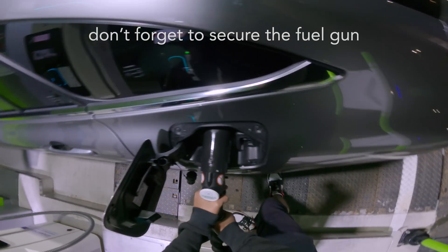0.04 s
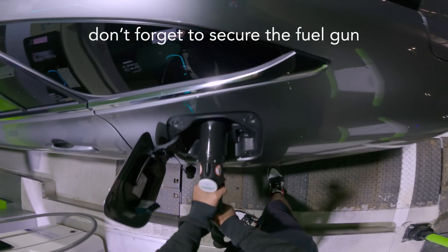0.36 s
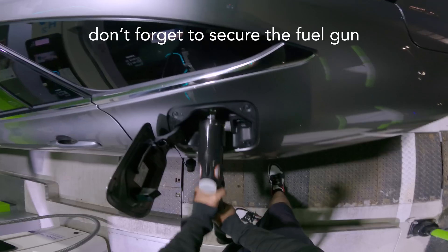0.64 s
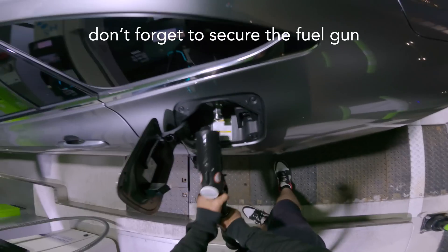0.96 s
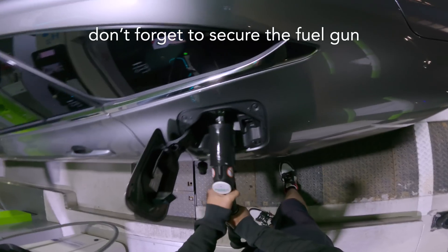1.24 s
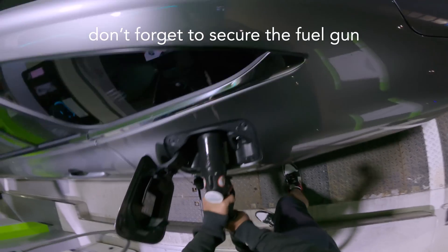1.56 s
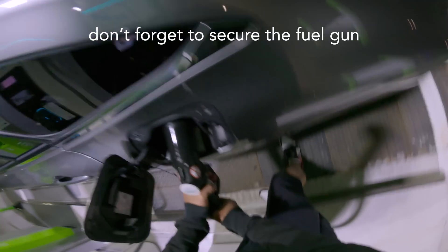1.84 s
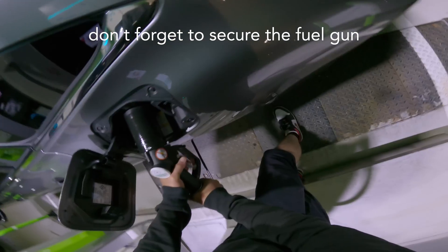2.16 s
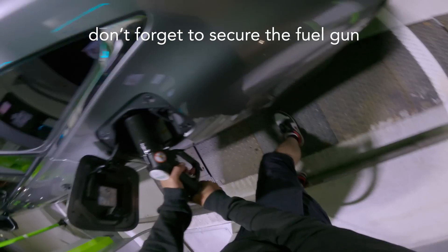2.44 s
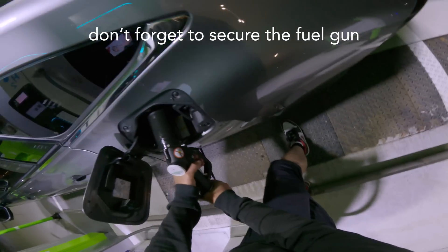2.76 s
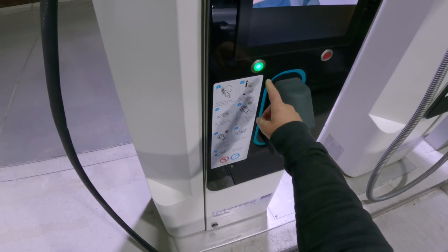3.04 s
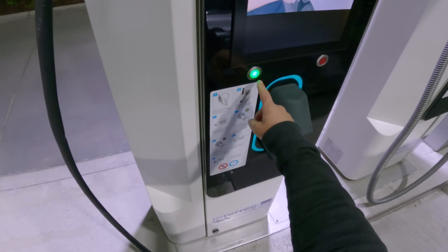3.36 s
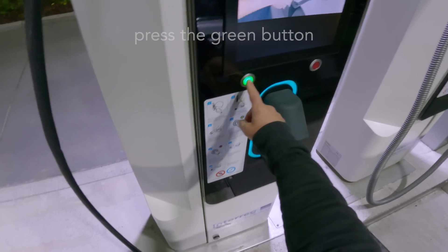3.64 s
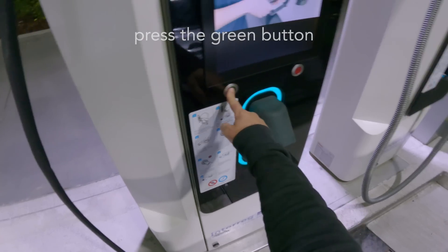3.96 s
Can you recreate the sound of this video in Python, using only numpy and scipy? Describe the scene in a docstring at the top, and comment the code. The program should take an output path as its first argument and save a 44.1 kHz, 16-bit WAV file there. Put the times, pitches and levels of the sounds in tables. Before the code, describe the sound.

Close by, a metal fuel nozzle is pushed into a car's filler port in two bursts of clunks and clinks, then latches with a sharp snap. The low hum and traffic rush of a covered filling station continue afterward.

```python
"""Fuel nozzle into a filler port.

A nozzle is pushed into a car's filler port, seated and locked, an arm's length from the microphone.
Each contact rings the body panel, the filler neck and the metal spout, and the car thuds.
The spout scrapes, squeaks and clinks on its way in; the latch snaps shut.
Under a station roof, machines hum and traffic rushes; near the end the pump's own hum takes over."""
import sys
import numpy as np
from scipy import signal
from scipy.fft import rfft, irfft
from scipy.io import wavfile
from scipy.ndimage import uniform_filter1d, minimum_filter1d

SR = 44100
rng = np.random.default_rng(int(sys.argv[2]) if len(sys.argv) > 2 else 0)


def to_wav(sig):
    """Store sig (one row per channel, or 1-D mono) as 16-bit WAV at the path in sys.argv[1].

    Samples outside -1..1 are clipped; the rate is SR.
    """
    pcm = np.clip(np.atleast_2d(sig), -1, 1) * 32767
    pcm = np.round(pcm).astype(np.int16)
    wavfile.write(sys.argv[1], SR, pcm.T)  # frames by channels


N = 4 * SR


def undb(db):
    """Decibels to gain."""
    return 10 ** (np.asarray(db) / 20)


def unit(x):
    """Scale to rms 1."""
    return x / np.sqrt(np.mean(x ** 2))


def colour(x, points):
    """Filter by a curve of (Hz, dB) points."""
    hz, db = np.array(points, float).T
    bins_hz = np.maximum(np.fft.rfftfreq(x.shape[-1], 1 / SR), 1)
    gain = undb(np.interp(np.log(bins_hz), np.log(hz), db))
    return irfft(rfft(x) * gain, x.shape[-1])


def noise(points, size):
    """Coloured noise of rms 1."""
    return unit(colour(rng.standard_normal(size), points))


def fade(t, t60):
    """Free decay, 60 dB down at t60."""
    return np.exp(-np.log(1000) * t / t60)


def mode(t, hz, t60):
    """Decaying sine of random phase."""
    return np.sin(2 * np.pi * (hz * t + rng.random())) * fade(t, t60)


def walk(rate_hz):
    """Random wander, spread near 1."""
    knots = rng.standard_normal(256)
    return np.interp(np.arange(N) / SR * rate_hz, np.arange(len(knots)), knots)


def add(out, start_s, x):
    """Mix a sound in at its time."""
    i = int(start_s * SR)
    out[i:i + len(x)] += x[:N - i]


# Background spectra by the car and by the pump. Each row: frequency in Hz, relative level in dB.
CAR_AIR_COLOUR = [(13, -37), (22, -14), (36, -8), (66, 1.5), (161, -12.5), (201, -14), (311, -20.5),
                  (387, -27), (420, -26), (537, -28.5), (582, -23), (668, -28), (1010, -18), (1320, -22),
                  (1780, -25), (2610, -37), (4640, -45), (12100, -76), (15000, -108)]
PUMP_AIR_COLOUR = [(13, -37), (22, -22), (53, 0), (86, -8.5), (120, -12), (243, -20), (264, -22),
                   (366, -23.5), (420, -26.5), (455, -25), (522, -26.5), (582, -19.5), (632, -24.5),
                   (1030, -17), (1690, -24), (3340, -42.5), (5930, -50.5), (9430, -65), (15000, -94)]
# Stereo width. Each row: frequency in Hz, side against mid in dB.
AIR_WIDTH = [(40, -33.5), (150, -31.5), (350, -15), (700, -8), (1400, -5.5), (3000, -4.5), (10000, -6.5)]
# Background swell. Each row: time in seconds, rumble gain in dB, traffic gain in dB.
AIR_SWELL = [(0, -1.5, -2.5), (.35, 0, 1), (.62, -1, 2.5), (1.1, -2.5, -1.5), (1.75, -5, -1),
             (2.2, -4.5, 2.5), (2.55, -3, -.5), (3.3, 1, -2), (3.75, -2.5, -1.5), (3.92, 3.5, -2),
             (4, 0, -2)]
# Machine tones. Each row: frequency in Hz, level by the car in dB, level by the pump in dB.
HUM_TONES = [(50, -35, -28), (192.4, -35.5, -44.5), (366, -50.5, -45), (586.5, -48.5, -40),
             (954, -48.5, -43)]
PUMP_TAKEOVER_S, CAR_AIR_DB, PUMP_AIR_DB, HUM_WANDER_HZ = 2.9, -21, -22, 1.44


def station(t):
    """Machines rumble and hum under the rush of traffic; the pump takes over late."""
    pump_share = np.clip((t - PUMP_TAKEOVER_S) / 0.14 + 0.5, 0, 1)
    car_gain = undb(CAR_AIR_DB) * np.sqrt(1 - pump_share)
    pump_gain = undb(PUMP_AIR_DB) * np.sqrt(pump_share)
    mid, side = (car_gain * noise(CAR_AIR_COLOUR, N) + pump_gain * noise(PUMP_AIR_COLOUR, N)
                 for _ in range(2))
    air = mid + colour(side, AIR_WIDTH) * np.array([[1], [-1]])
    rumble = colour(air, [(200, -5), (350, -7), (700, -30)])
    traffic = air - rumble
    times, rumble_db, traffic_db = np.array(AIR_SWELL).T
    out = rumble * undb(np.interp(t, times, rumble_db))
    out += traffic * undb(np.interp(t, times, traffic_db) + 0.5 * walk(9))
    for hz, car_db, pump_db in HUM_TONES:
        phase = 2 * np.pi * np.cumsum(hz + HUM_WANDER_HZ * walk(7.1)) / SR
        hum_db = car_db + (pump_db - car_db) * pump_share + 2 * walk(3.8)
        out += undb(hum_db) * np.sqrt(2) * np.sin(phase)
    return out


# Reflections off car and ground. Each row: delay in seconds, gain in dB.
ECHOES = [(.0047, -29), (0.0152, -23)]
# Spectra of roof tail and side scatter. Each row: frequency in Hz, relative level in dB.
ROOF_COLOUR = [(60, -13), (200, -1.5), (450, -9.5), (1500, -4.5), (5000, -19.5), (14000, -34)]
SCATTER_COLOUR = [(60, -29), (250, -20), (600, -2.5), (1200, -0.5), (4000, 3), (12000, 0)]
ROOF_DB, SCATTER_DB = -25, -12.5


def forecourt(x):
    """Near reflections and a weak tail under the roof; mids and treble scatter left and right."""
    t = np.arange(SR // 2) / SR
    near = x.copy()
    for delay_s, db in ECHOES:
        add(near, delay_s, undb(db) * x)
    tail = noise(ROOF_COLOUR, len(t)) * fade(t, t60=0.57) * (1 - np.exp(-t / 0.015))
    roof = signal.fftconvolve(x, tail / np.linalg.norm(tail))[:N]
    scatter = noise(SCATTER_COLOUR, len(t)) * fade(t, t60=0.051)
    side = signal.fftconvolve(x, scatter / np.linalg.norm(scatter))[:N]
    return near + undb(ROOF_DB) * roof + undb(SCATTER_DB) * side * np.array([[1], [-1]])


# Sleeve spectrum. Each row: frequency in Hz, relative level in dB.
RUSTLE_COLOUR = [(1000, -10), (4000, -5), (8000, -11.5), (12000, -32), (16000, -35)]


def rustle(t, peak_s=3.915, width_s=0.023, level_db=-41):
    """A sleeve hisses faintly as the hand reaches the button."""
    return undb(level_db) * noise(RUSTLE_COLOUR, N) * np.exp(-np.abs(t - peak_s) / width_s)


def squeak(t, peak_s=0.7145, width_s=0.005, centre_hz=2020, rise_hz_per_s=30000, level_db=-24):
    """The spout catches: a brief, rising stick-slip chirp."""
    since = t - peak_s
    hz = centre_hz + rise_hz_per_s * np.clip(since, -0.02, 0.02)
    envelope = np.exp(-(since / width_s) ** 2)
    return undb(level_db) * envelope * np.sin(2 * np.pi * np.cumsum(hz) / SR)


# Scrape envelope. Each row: time in seconds, level in dB.
SLIDE_LEVELS = [(.69, -50), (.712, -20), (.728, -19), (.745, -22), (.775, -36), (.80, -59)]
# Scrape spectrum. Each row: frequency in Hz, relative level in dB.
SLIDE_COLOUR = [(300, 3), (1000, 3), (2000, 0.5), (2800, -12), (4500, -8.5), (7000, -29), (12000, -47),
                (16000, -55)]


def slide(t):
    """The spout scrapes along the port in uneven catches."""
    times, db = np.array(SLIDE_LEVELS).T
    envelope = undb(np.interp(t, times, db)) * (t > times[0]) * (t < times[-1])
    catches = rng.standard_normal(N) * undb(3.3 * walk(58.2))
    return envelope * unit(colour(catches, SLIDE_COLOUR))


# Tip strikes. Each row: start in seconds, level in dB.
CLINKS = [(0.7546, -18.5), (.7580, -15.5), (0.7663, -25), (1.3550, -14.5)]
# Tip modes. Each row: frequency in Hz, relative level in dB, t60 in seconds.
TIP_MODES = [(2448, -6, .07), (4620, -3.5, 0.11), (4700, -7, 0.1), (4770, -10, 0.073), (4910, 5.5, 0.02),
             (5160, -6.5, 0.053), (5160, -19, .04)]


def tip(attack_s=0.00043):
    """The spout's steel tip clinks against the rim and rings on in close, beating modes."""
    out, t = np.zeros(N), np.arange(SR // 4) / SR
    attack = 1 - np.exp(-(t / attack_s) ** 2)
    for start_s, level_db in CLINKS:
        for hz, db, t60 in TIP_MODES:
            detune = 1 + 0.003 * rng.standard_normal()
            add(out, start_s, undb(level_db + db) * attack * mode(t, hz * detune, t60))
    return out


# Latch snaps. Each row: start in seconds, level in dB.
SNAPS = [(2.3328, 3.5), (2.3378, 10), (2.6006, 2), (2.6055, -20), (2.6135, -20)]
# Snap spectrum. Each row: frequency in Hz, relative level in dB.
SNAP_COLOUR = [(200, 2), (600, -1), (1050, -12), (1600, -10), (2400, -6), (3000, 1), (3600, 5), (4600, -3),
               (5800, 3.5), (7000, -2.5), (8200, -8.5), (9300, -12.5), (10700, -13), (13000, -25),
               (16000, -44)]
# Latch modes. Each row: frequency in Hz, relative level in dB, t60 in seconds.
LATCH_MODES = [(1050, -6.5, 0.019), (1580, -9, .016), (3470, 0.5, 0.0096), (3940, -7, 0.01),
               (5030, -6, .012), (5730, 2, 0.0091), (6600, -14, 0.0064), (10700, -21, 0.01)]


def latch(attack_s=0.00057, ring_db=-7, tail_db=-34):
    """The latch snaps shut: a bright crack, a few very short modes and a faint tail."""
    out, t = np.zeros(N), np.arange(SR // 8) / SR
    decay = fade(t, t60=0.0072) + undb(tail_db) * fade(t, t60=0.12)
    attack = 1 - np.exp(-t / attack_s)
    for start_s, level_db in SNAPS:
        ring = sum(undb(ring_db + db) * mode(t, hz, t60) for hz, db, t60 in LATCH_MODES)
        crack = decay * noise(SNAP_COLOUR, len(t))
        add(out, start_s, undb(level_db) * attack * (ring + crack))
    return out


def struck_part(t, modes, crowd_colour, ring_scale, crowd_t60, crowd_db, crack_db, attack_s):
    """A brief crack, then clear modes over a crowd of weaker ones, played as noise."""
    hz, db, t60 = np.array(modes, float).T[:, :, None]
    gain = undb(db) / np.sqrt(np.sum(undb(db) ** 2) / 2)
    detune = 1 + 0.0046 * rng.standard_normal(hz.shape)
    signs = (-1) ** np.arange(len(hz))[:, None]
    sines = signs * np.sin(2 * np.pi * hz * detune * t)
    clear = np.sum(gain * sines * fade(t, t60 * ring_scale), axis=0)
    crowd_decay = undb(crowd_db) * fade(t, crowd_t60 * ring_scale)
    crack_decay = undb(crack_db) * fade(t, t60=0.022)
    dense = noise(crowd_colour, len(t)) * np.hypot(crowd_decay, crack_decay)
    attack = 1 - np.exp(-t / attack_s)
    return attack * (clear + dense) / np.hypot(1, undb(crowd_db))


# Nozzle contacts. Each row: start in seconds, thud in dB, panel in dB, favoured panel pitch in Hz,
# neck in dB, spout in dB, click in dB, ring time as a factor.
CONTACTS = [ (0.6579, -28, -20, 230, -35, -33, -30, 0.94), (0.6634, -9.5, -4.5, 268, -23.5, -23, -32, 0.72),
            (.7370, -22, -18.5, 400, -23, -25.5, -27, 1.4), (.7540, -33, -10, 346, -28, -20, -16, 0.77),
            (.7580, -21, -13.5, 260, -17, -27, -29, 0.96), (0.766, -39, -38, 400, -30, -23, -20, 0.68),
            (.8530, -7, -11, 210, -15.5, -29, -21.5, .45), (0.8576, -17, -1, 192, -33, -27, -23, 0.27),
            (0.871, -42, -30, 215, -43, -52, -28, 0.46), (.9350, -21, -29, 210, -41, -54, -35, .8),
            (1.1990, -5.5, -3.5, 158, -6.5, -29, -23.5, 1.16),
            (1.2100, -26, -14, 590, -11.5, -50, -50, 0.78), (1.2320, -28, -14, 160, -25, -53, -50, .8),
            (1.2780, -20, -21.5, 160, -40, -57, -55, 1.7), (1.3550, -12.5, -8.5, 420, -8, -15, -21, 1),
            (1.3689, -26, -3.5, 214, -18, -20.5, -33, 1.2), (1.4000, -36, -37, 215, -32, -30, -42, 0.98),
            (1.4140, -50, -44, 215, -36, -30, -36, 1), (1.4290, -28, -4, 484, -7, -25, -20.5, 0.94),
            (1.4396, -40, -7.5, 290, -11.5, -14.5, -19, 0.78), (1.4470, -26, -7, 215, -15.5, -22, -18, 1.4),
            (1.4550, -47, -28, 400, -20, -33, -15, 0.49), (1.6092, -8, -7.5, 497, -27.5, -37, -12, 0.59),
            (1.617, -18, -31, 420, -43, -38, -48, 0.79), (2.2856, -28, -22.5, 300, -35, -28.5, -28, 1.2),
            (2.3010, -13, -12.5, 458, -26, -23.5, -15, 0.92), (2.3045, -8.5, -4, 275, -30, -35, -35, 0.63),
            (2.337, -5, -5.5, 180, -15, -26, -27, 0.2), (2.371, 4, 0, 331, -3.5, -9, -2.5, .65),
            (2.4480, -15, -11.5, 162, -40, -62, -38, 0.47)]
# Clear modes. Each row: frequency in Hz, relative level in dB, t60 in seconds at ring factor 1.
PANEL_MODES = [(156, -6, 0.32), (209.9, 0, 0.21), (232.6, -1.5, 0.19), (290.4, -3.5, 0.2),
               (408.5, -1.5, .2), (486, -3.5, 0.16), (597, -17.5, 0.16), (646, -3.5, 0.064),
               (731, -8.5, 0.18)]
NECK_MODES = [(909, -1.5, .17), (972, 4, 0.15), (1060, -8, 0.12), (1111, -5.5, .16), (1246, -7.5, 0.32),
              (1304, -7, 0.073), (1690, -3.5, 0.15)]
SPOUT_MODES = [(2265, 1.5, .16), (2460, -8.5, .14), (2584, 10.5, 0.04), (2710, 4, 0.033), (3305, 1.5, 0.13),
               (3650, -8, 0.12), (4127, 6, 0.063), (4670, -12.5, 0.04)]
# Spectra of the mode crowds and the click. Each row: frequency in Hz, relative level in dB.
PANEL_COLOUR = [(60, -31), (140, 14), (300, 4.5), (550, -2.5), (800, -18.5), (2000, -60.5)]
NECK_COLOUR = [(200, -23), (500, 4), (780, 1.5), (1050, 10), (1400, 1), (2000, -16), (3000, -25),
               (7000, -87)]
SPOUT_COLOUR = [(700, -17), (1700, 4), (2550, 4.5), (3100, 0), (4000, 0), (5100, -4), (6000, -15),
                (8500, -26.5), (11000, -41), (16000, -63)]
CLICK_COLOUR = [(300, -4), (1200, 9.5), (2400, -7), (3600, -1.5), (4600, -4), (5800, 5), (7000, -1.5),
                (8300, -14), (10500, -18), (13000, -25), (16000, -39)]
FAVOUR_OCTAVES, FAVOUR_DB = 0.27, 8.5
THUD_HZ, THUD_RISE_S, METAL_ATTACK_S = 108, 0.023, 0.00021


def nozzle():
    """Every contact clicks, rings panel, neck and spout, and sets the car's body swinging."""
    out, t = np.zeros(N), np.arange(SR // 2) / SR
    swing = (t / THUD_RISE_S * np.exp(1 - t / THUD_RISE_S)) ** 2
    thud = swing * np.sin(2 * np.pi * THUD_HZ * t)
    click_envelope = fade(t, t60=0.0098) * (1 - np.exp(-t / METAL_ATTACK_S))
    for start_s, thud_db, panel_db, favoured_hz, neck_db, spout_db, click_db, ring_scale in CONTACTS:
        # Where the nozzle lands, panel modes near one pitch answer most.
        favoured = [(hz, db + FAVOUR_DB * np.exp(-(np.log2(hz / favoured_hz) / FAVOUR_OCTAVES) ** 2), t60)
                    for hz, db, t60 in PANEL_MODES]
        panel = struck_part(t, favoured, PANEL_COLOUR, ring_scale,
                            crowd_t60=0.21, crowd_db=-3.5, crack_db=-7, attack_s=0.00067)
        neck = struck_part(t, NECK_MODES, NECK_COLOUR, ring_scale,
                           crowd_t60=0.12, crowd_db=7.5, crack_db=6, attack_s=0.0005)
        spout = struck_part(t, SPOUT_MODES, SPOUT_COLOUR, ring_scale,
                            crowd_t60=0.12, crowd_db=1, crack_db=7.5, attack_s=METAL_ATTACK_S)
        click = noise(CLICK_COLOUR, len(t)) * click_envelope
        ringing = undb(panel_db) * panel + undb(neck_db) * neck + undb(spout_db) * spout
        add(out, start_s, undb(thud_db) * thud + ringing + undb(click_db) * click)
    return out


def scene():
    """The nozzle's contacts over the sound of the station, in stereo."""
    t = np.arange(N) / SR
    handling = nozzle() + tip() + latch() + slide(t) + squeak(t)
    return forecourt(handling) + station(t) + rustle(t)


DUCK_THRESHOLD, DUCK_RELEASE_S, DUCK_SHARE = 0.46, 0.15, 0.37
PEAK_LIMIT, HOLD_S, LOWPASS_HZ = 0.96, 0.0015, 15870


def record(dry):
    """Gain control ducks after loud knocks, a fast limiter holds the peaks, and the top is cut."""
    hold = int(HOLD_S * SR)
    release = np.arange(N) / SR / DUCK_RELEASE_S
    log_excess = np.log(np.maximum(np.abs(dry).max(axis=0) / DUCK_THRESHOLD, 1))
    held_excess = np.maximum.accumulate(log_excess + release) - release
    ducked = dry * np.exp(-DUCK_SHARE * uniform_filter1d(held_excess, hold))
    limiter_gain = np.minimum(1, PEAK_LIMIT / (np.abs(ducked).max(axis=0) + 1e-9))
    limited = ducked * uniform_filter1d(minimum_filter1d(limiter_gain, hold), hold)
    lowpass = signal.ellip(8, 0.2, 70, LOWPASS_HZ, fs=SR, output="sos")
    return signal.sosfilt(lowpass, limited)


dry = scene()
out = record(dry)
to_wav(out)
```